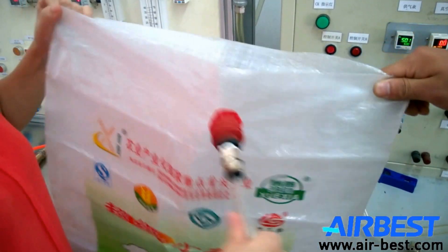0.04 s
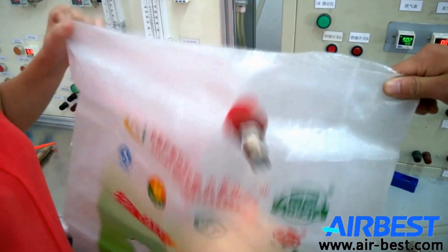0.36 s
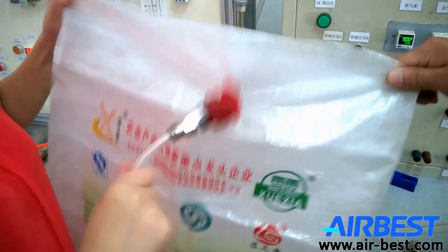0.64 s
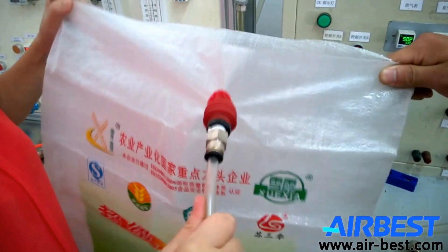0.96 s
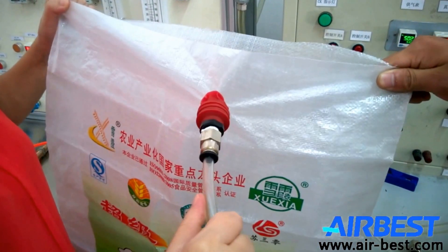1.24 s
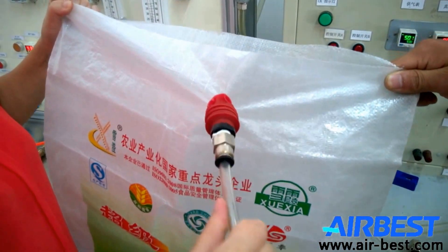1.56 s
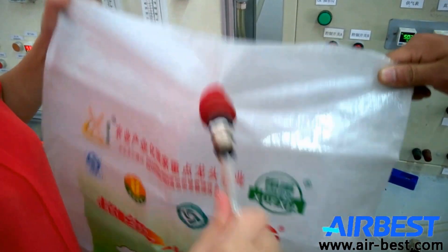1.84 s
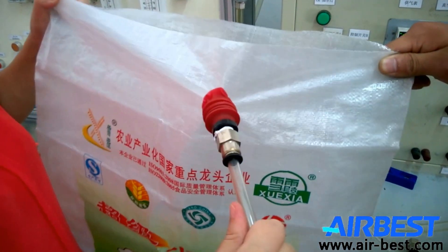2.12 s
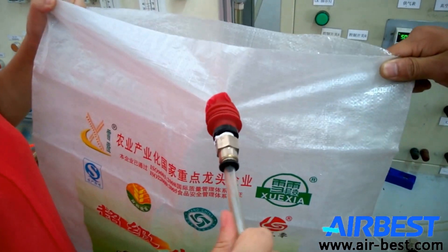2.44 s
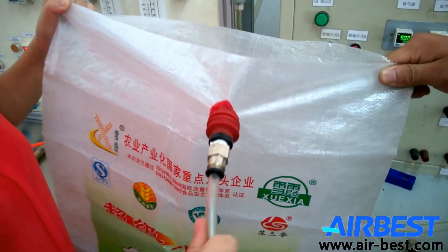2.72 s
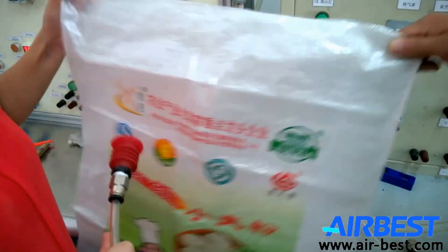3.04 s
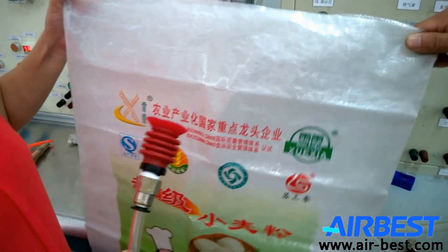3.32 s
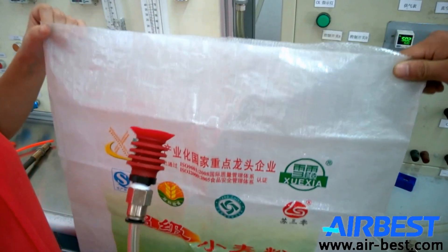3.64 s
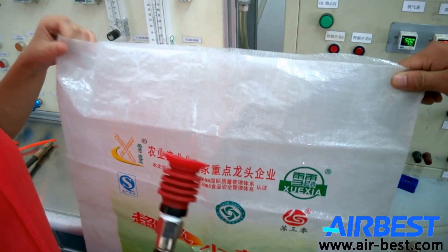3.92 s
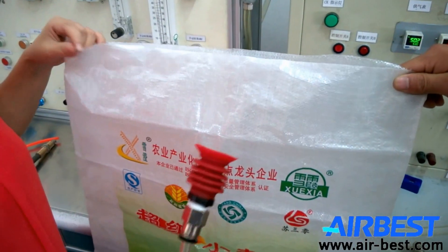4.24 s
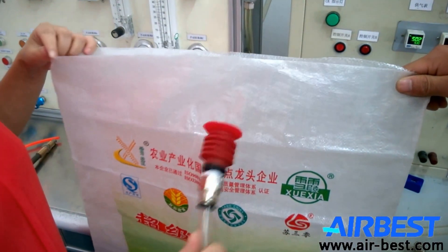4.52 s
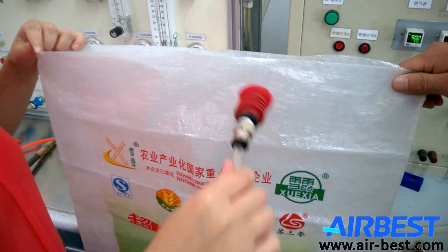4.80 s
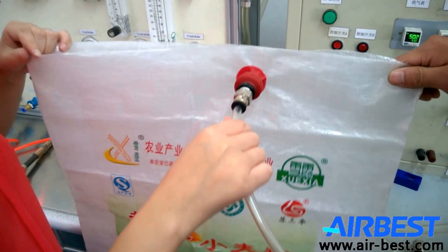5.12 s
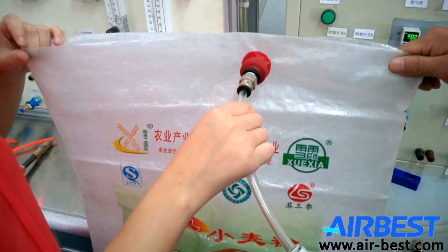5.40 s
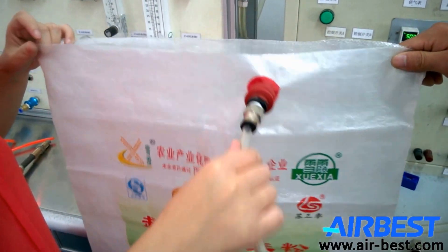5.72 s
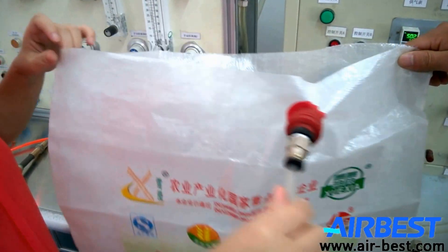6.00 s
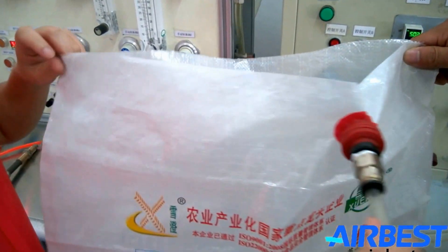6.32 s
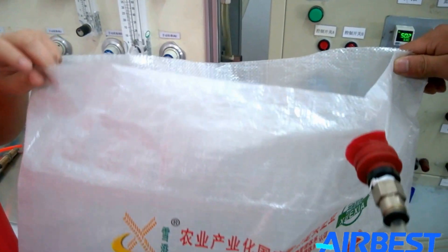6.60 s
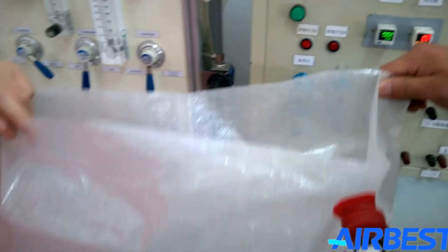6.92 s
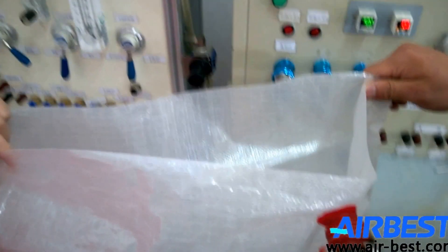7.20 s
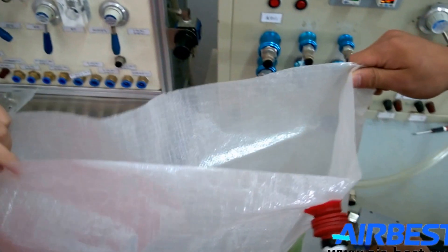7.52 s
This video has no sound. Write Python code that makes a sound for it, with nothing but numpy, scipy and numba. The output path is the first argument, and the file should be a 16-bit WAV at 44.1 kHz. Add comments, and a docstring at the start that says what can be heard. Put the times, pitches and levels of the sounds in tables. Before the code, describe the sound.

A hollow rush of air runs while a woven plastic bag drums and snaps against a suction cup, then comes off with a puff.

```python
"""A hollow, hissing roar: the exhaust of a compressed-air ejector whose bellows suction cup holds a
woven plastic bag. The bag is tugged seven times, pulled off with a puff and a buzz, and gripped again.
The jet's resonance falls and its hiss dulls as the cup seals; both rise when it draws free air.
The bag is a damped membrane that drums and snaps when taut and flaps when slack. A machine hums
alongside; a control panel and the bag reflect the hiss, and the hall reverberates with the rest."""
import sys
import numpy as np
from scipy import signal
from scipy.fft import rfft, irfft
from scipy.io import wavfile
from scipy.ndimage import uniform_filter1d
from numba import njit

SR = 44100
rng = np.random.default_rng(int(sys.argv[2]) if len(sys.argv) > 2 else 0)


def to_wav(s):
    """Save 16-bit WAV."""
    ch = np.atleast_2d(s).T  # columns
    pcm = np.round(np.clip(ch, -1, 1) * 32767)  # PCM
    wavfile.write(sys.argv[1], SR, pcm.astype(np.int16))


N = 341775
T = np.arange(N) / SR
FREQS = np.maximum(np.arange(N // 2 + 1) * SR / N, 1)

# shifts of the cup's grip: t/s, settling time/s, air flow (0 sealed, 1 open),
# relative jet level/dB, relative rim sizzle level/dB
GRIPS = [(0, .01, .07, -27, -33), (.53, 0.094, 0.35, -30, -31), (.75, .07, 0.43, -34.5, -29.5),
         (1.35, .07, .29, -27, -33.5), (1.7, 0.19, 0.24, -30.5, -34.5), (2.15, .25, 0.34, -28, -34.5),
         (2.58, 0.39, 0.31, -35, -30), (3.01, 0.05, 0.96, -28.5, -27), (3.7, 0.74, 0.96, -30, -28),
         (5.0, 0.12, .01, -29, -35.8), (5.82, 0.21, 0.73, -34.5, -29.5), (6.55, .6, 0.66, -26.5, -29.5),
         (7.28, 0.25, 0.66, -28, -29.5)]
# spectra of the turbulent air: f/Hz, relative spectral level/dB
ROAR_SPECTRUM = [(25, -52), (60, -40), (120, -29), (250, -14), (420, -4), (550, -6), (680, 3.5), (800, -1),
                 (950, -2), (1150, 0.5), (1560, 2), (1730, -3), (2200, 0), (2750, 1), (3300, -10.5),
                 (6000, -22)]
HISS_SPECTRUM = [(1500, -31), (2900, 1), (3700, 4), (4400, -1), (5000, 0), (5700, -3.5), (6600, -2.5),
                 (7500, -3.5), (10000, -6), (16000, -38)]
SIZZLE_SPECTRUM = [(100, -49), (5000, -14), (7500, -4), (9300, -0.5), (10100, 2.5), (11000, 0.5),
                   (12000, 2.5), (13200, 2), (14500, -2.5), (16000, -4)]
INTAKE_SPECTRUM = [(30, -46), (60, -24), (130, -10), (200, -4.5), (300, -1), (420, 3), (560, 0), (750, 3.5),
                   (950, -1), (1150, -10), (1500, -32), (4000, -21)]
# resonances of the exhaust housing and the bench: f/Hz, bandwidth/Hz, gain at full drive/dB
HOUSING_MODES = [(661, 37, 3.5), (712, 11, 2.5), (742, 10.5, 0.5), (740.7, 6.9, 6), (878, 16, 2),
                 (1076, 13.4, 7), (1126, 15.6, 10.5), (1172, 24, 7.5), (1235, 18, 5), (1365, 24, 6),
                 (1480, 28, 2), (1508, 17, 6), (1585, 24.5, 9.5), (1793, 9.8, 4), (1880, 21, 4.5),
                 (2000, 13.6, 10.5), (2154, 24, 10), (2282, 10, 11), (2490, 11, 7)]
# breathy tones at the rim: start t/s, end t/s, f/Hz, level/dB
EDGE_TONES = [(0, 0.548, 4830, -46), (.75, 1.4, 10200, -42), (1.4, 2.95, 10200, -46),
              (3.1, 5.0, 10500, -57), (3.35, 4.002, 4950, -43), (3.55, 3.95, 7050, -46),
              (4.15, 4.85, 8650, -45), (3.2, 5.0, 3650, -55), (6.0, 6.8, 13700, -43)]
# tugs that stretch the bag: t/s, drumming level/dB, rustle level/dB, relative snap level/dB
TUGS = [(.712, -25, -24.5, -22), (.981, -26, -27, -18.5), (1.247, -25, -25, -17), (1.51, -25, -27.5, -23),
        (1.772, -25, -24.5, -20), (2.038, -26, -25.5, -18), (2.310, -26, -25.5, -20)]
# the snap and two rebounds within each tug: delay/s, relative level/dB, f/Hz, T60/s
REBOUNDS = [(0, 3.5, 200, .03), (.024, 0, 248, .035), (.097, -2.5, 225, .028)]
# looser shakes as the cup takes hold, eases off and pulls free: t/s, drumming level/dB, rustle level/dB
SHAKES = [(.39, -35.5, -39), (.49, -36, -30.5), (2.57, -35.5, -52), (2.91, -39, -48), (3.08, -28.5, -25),
          (3.22, -40, -31)]
# spectra of the vibrating sheet: f/Hz, relative spectral level/dB
DRUM_SPECTRUM = [(25, -33), (50, -11), (75, -18), (105, 3.5), (155, 1), (215, 5), (265, -3), (300, 2.5),
                 (360, -1.5), (450, -8), (700, -22), (2000, -46), (6000, -90)]
RUSTLE_SPECTRUM = [(100, -40), (300, -24), (520, -20), (630, -6), (880, -5), (1050, -8), (1400, -12.5),
                   (2500, -35), (8000, -34)]
# single flaps of the slack bag: t/s, peak level/dB, f/Hz, T60/s
SLACK_FLAPS = [(.294, -21, 200, 0.038), (.526, -13.5, 202, 0.051), (.618, -28, 70, 0.076),
               (3.044, -25, 130, 0.026), (3.083, -25, 95, .07), (3.178, -27, 96, 0.085),
               (4.974, -27, 172, .025), (4.992, -33, 148.7, 0.027)]
# air bursting past the cup's lip: t/s, relative level/dB, T60/s, f/Hz, bandwidth/Hz
LIP_PUFFS = [(.524, -16.5, 0.1, 1700, 2200), (3.040, -4, 0.063, 3170, 300), (3.044, -21, 0.068, 2315, 5000)]
# the sheet buzzing against the lip as it slides off: t/s, f/Hz, level/dB
LIP_BUZZ = [(3.08, 253, -34), (3.105, 277, -29), (3.14, 288, -25.5), (3.19, 307, -36), (3.21, 310, -44),
            (3.27, 295, -31), (3.33, 300, -43)]
# mains and motor lines of the machine: f/Hz, level/dB
HUM_LINES = [(100, -61), (297, -64), (348, -59)]
# low rumble, swelling near 7 s: t/s, level/dB
RUMBLE_LEVELS = [(0, -55), (.7, -48), (2.6, -53), (3.6, -62), (4.3, -61), (4.9, -53), (5.8, -61),
                 (6.7, -56), (7.0, -56), (7.55, -63)]
# stereo width: f/Hz, side level relative to mid/dB
SIDE_LEVELS = [(30, -37), (80, -29), (480, -25), (900, -30), (1130, -41), (2200, -40), (3000, -26),
               (4000, -21), (5500, -17.5), (8000, -16.5), (16000, -18)]

# set by the air flow: (cup sealed, cup open); the levels are relative
JET_HZ, JET_WIDTH_HZ = (1768, 2530), (200, 580)
ROAR_DB, HISS_DB, INTAKE_DB = (-28.4, -26), (-37, -30.5), (-48.5, -34)


def exhaust(flow, jet_db, trim_db=-2.0, waver_db=.5, flutter_db=.5):
    """Jet turbulence roars broadly and excites a resonance that rises and widens with the flow."""
    hz, width = opened(JET_HZ, flow), opened(JET_WIDTH_HZ, flow, power=2.3)
    roar = colour(noise(), ROAR_SPECTRUM) * undb(opened(ROAR_DB, flow, power=1.15))
    jet = resonate(noise(), hz, width)
    jet = unit(resonate(jet, hz, 4 * width) / np.sqrt(width))  # a wider pass steepens the flanks
    jet = housing(jet, depth=0.71) * undb(jet_db + trim_db + flutter_db * walk(6))
    return (housing(roar) + jet) * undb(waver_db * walk(2.7))


def grip():
    """The seal throttles the air: flow, jet level and sizzle level ease to each new grip's values."""
    state = np.outer(GRIPS[0][2:], np.ones(N))
    for before, (start, settle_s, *after) in zip(GRIPS, GRIPS[1:]):
        ease = np.sin(np.pi / 2 * np.clip((T - start) / settle_s, 0, 1)) ** 2
        state = state + np.outer(np.subtract(after, before[2:]), ease)
    flow, jet_db, rim_db = state
    return np.maximum(flow, 0), jet_db, rim_db


def housing(x, depth=1):
    """Narrow fixed resonances make the rush hollow; depth is how strongly the air drives them."""
    lift_db = sum(db / (1 + (2 * (FREQS - hz) / width) ** 2) for hz, width, db in HOUSING_MODES)
    return irfft(rfft(x) * undb(depth * lift_db), N)


def intake(flow):
    """Turbulent inflow at the open cup adds a throaty rush."""
    return housing(colour(noise(), INTAKE_SPECTRUM)) * undb(opened(INTAKE_DB, flow, power=1.8))


def hiss(flow, rim_db, trim_db=0.37, flicker_db=0.39):
    """Fine-scale turbulence radiates treble: a rush at the nozzle and a sizzle at the cup's rim."""
    rush = colour(reflections(noise()), HISS_SPECTRUM) * undb(opened(HISS_DB, flow, power=5.0))
    sizzle = colour(reflections(noise()), SIZZLE_SPECTRUM) * undb(rim_db + trim_db)
    return (rush + sizzle) * undb(flicker_db * walk(23))


def edge_tones(width_hz=300, drift=0.0034, waver_db=2.2):
    """Edge tones: air shearing over the rim half whistles, never at a steady pitch."""
    out = 0
    for start, end, hz, db in EDGE_TONES:
        centre = hz * (1 + drift * walk(1.5))
        tone = resonate(noise(), centre, steady(width_hz))
        tone = unit(resonate(tone, centre, steady(3 * width_hz)))
        out = out + tone * undb(db + waver_db * walk(5.1)) * gate(start, end)
    return out


def shudder(slips_per_s=500, scatter_db=3):
    """Impulsive excitation: dense slips of the weave drum on the sheet, which rustles when pulled."""
    starts, drum_db, rustle_db = np.transpose([row[:3] for row in TUGS + SHAKES])
    slips = (rng.random(N) < slips_per_s / SR) * np.sign(noise()) * undb(scatter_db * noise())
    drum = strain(starts, drum_db, attack_s=.016, hold_s=.205, sag_db_per_s=36, release_db_per_s=135)
    rustle = strain(starts, rustle_db, attack_s=.018, hold_s=.115, sag_db_per_s=28, release_db_per_s=160)
    return drum * colour(slips, DRUM_SPECTRUM) + rustle * colour(noise(), RUSTLE_SPECTRUM)


def strain(starts, levels_db, attack_s, hold_s, sag_db_per_s, release_db_per_s):
    """Envelope of pulls that rise, sag and die away; being incoherent, they add in power."""
    power = 0
    for start, db in zip(starts, levels_db):
        age = np.clip(T - start, 0, 2)
        fall_db = sag_db_per_s * np.minimum(age, hold_s) + release_db_per_s * np.maximum(age - hold_s, 0)
        power = power + (np.minimum(age / attack_s, 1) * undb(db - fall_db)) ** 2
    return np.sqrt(power)


def flaps(taut_cutoff_hz=95):
    """Tension raises a membrane's pitch: each tug snaps it three times; slack, it flaps once, deeper."""
    taut = [(start + delay, snap_db + db, hz, t60)
            for start, _, _, snap_db in TUGS for delay, db, hz, t60 in REBOUNDS]
    bass_cut = signal.butter(2, taut_cutoff_hz, "high", fs=SR, output="sos")
    return signal.sosfilt(bass_cut, place(taut, snap)) + place(SLACK_FLAPS, snap)


def snap(age, hz, t60, rise_s=0.00073):
    """A heavily damped free oscillation of the sheet, with peak 1."""
    onset = 1 - np.exp(-(age / rise_s) ** 2)
    swing = -np.sin(2 * np.pi * hz * age) * onset * undb(-60 * age / t60)
    return swing / np.abs(swing).max()


def lip_buzz(waver=0.0236, octave_db=-12):
    """Self-sustained oscillation: the loose sheet beats against the cup's lip like a reed."""
    hz, db = curves(LIP_BUZZ)
    phase = 2 * np.pi * np.cumsum(hz * (1 + waver * walk(43))) / SR
    buzz = np.sqrt(2) * (np.sin(phase) + undb(octave_db) * np.sin(2 * phase))
    return buzz * undb(db) * gate(LIP_BUZZ[0][0], LIP_BUZZ[-1][0])


def puff(age, t60, hz, width, rise_s=0.0026):
    """As the seal breaks, a turbulent burst excites one resonance; the soft lip opens gradually."""
    swell = (1 - np.exp(-age / rise_s)) * undb(-60 * age / t60)
    return 2 * resonate(rng.standard_normal(len(age)) * swell, steady(hz), steady(width))


def machine(waver_db=5.0):
    """Forced vibration: mains and motor radiate wavering spectral lines; a faint low rumble lies beneath."""
    hum = 0
    for hz, db in HUM_LINES:
        phase = 2 * np.pi * hz * T + 0.6 * walk(4.1)
        hum = hum + np.sqrt(2) * np.sin(phase) * undb(db + waver_db * walk(3))
    rumble = colour(noise(), [(15, -11), (45, -9), (110, -8), (400, -14), (2000, -60)])
    return hum + rumble * undb(curves(RUMBLE_LEVELS)[0])


def reflections(x, gain=0.43, longest_s=.012, sway_s=.00004, count=8):
    """Comb filtering: echoes off the panel and bag make spectral ripples that shift as hands move."""
    lags = rng.uniform(0.001012, longest_s, count)
    echoes = sum(np.interp(T - lag - sway_s * walk(0.65), T, x, left=0) for lag in lags)
    return unit(x + gain * echoes)


def hall(x, t60=0.26, wet_db=-12):
    """Reverberation: a diffuse, exponentially decaying tail follows the direct sound."""
    tail = unit(noise() * undb(-60 * T / t60)) / np.sqrt(N)
    return x + undb(wet_db) * signal.fftconvolve(x, tail[:SR])[:N]


def widen(x, scatter_s=0.017):
    """Decorrelation: scattered sound arrives left and right in unrelated phase, mostly in the treble."""
    phase = np.angle(rfft(noise() * np.exp(-T / scatter_s)))
    side = irfft(rfft(x) * np.exp(1j * phase) * response(SIDE_LEVELS), N)
    return x + side * np.array([[1], [-1]])


@njit
def resonate(x, hz, width):
    """A second-order resonator (state-variable band-pass) whose centre and bandwidth can move."""
    out, band_state, low_state = np.empty(len(x)), 0., 0.
    for i in range(len(x)):
        step, damping = np.tan(np.pi * hz[i] / SR), width[i] / hz[i]
        band = (band_state + step * (x[i] - low_state)) / (1 + step * (step + damping))
        band_state = 2 * band - band_state
        low_state += 2 * step * band
        out[i] = damping * band
    return out


def opened(ends, flow, power=1):
    """A power law of the air flow leads from the sealed value to the open one."""
    return ends[0] + (ends[1] - ends[0]) * flow ** power


def place(rows, shape):
    """Superposition of one short sound per row of t/s, level/dB and shape arguments."""
    out, age = np.zeros(N + SR), np.arange(SR // 4) / SR
    for start_s, db, *settings in rows:
        start = int(start_s * SR)
        out[start:start + len(age)] += undb(db) * shape(age, *settings)
    return out[:N]


def response(points):
    """Gain at each frequency from points of f/Hz, level/dB, joined on a logarithmic axis."""
    hz, db = np.transpose(points)
    return undb(np.interp(np.log(FREQS), np.log(hz), db))


def colour(x, points):
    """Spectral shaping of x, at rms 1."""
    return unit(irfft(rfft(x) * response(points), N))


def curves(table):
    """Linear interpolation of each column of a timed table."""
    times, *columns = np.transpose(table)
    return [np.interp(T, times, column) for column in columns]


def gate(start, end):
    """A time window with soft edges."""
    return uniform_filter1d(1. * ((T > start) & (T < end)), size=1500)


def walk(rate_hz):
    """Slow random fluctuation: low-passed noise at rms 1."""
    return unit(irfft(rfft(noise()) / (1 + (FREQS / rate_hz) ** 4), N))


def noise():
    """White Gaussian noise."""
    return rng.standard_normal(N)


def steady(value):
    """A constant control signal."""
    return np.full(N, float(value))


def undb(db):
    """Decibels to amplitude ratio."""
    return 10 ** (np.asarray(db) / 20)


def unit(x):
    """Normalisation to rms 1."""
    return x / np.sqrt(np.mean(x ** 2))


def scene():
    """Superposition: air, bag and machine sound in the hall; hiss and edge tones skip its tail."""
    flow, jet_db, rim_db = grip()
    air = exhaust(flow, jet_db) + intake(flow)
    bag = shudder() + flaps() + lip_buzz() + place(LIP_PUFFS, puff)
    return widen(hall(air + bag + machine()) + hiss(flow, rim_db) + edge_tones())


def record(dry, cutoff_hz=15850):
    """Band limiting: a steep elliptic low-pass removes the highest treble."""
    return signal.sosfilt(signal.ellip(12, .2, 80, cutoff_hz, fs=SR, output="sos"), dry)


dry = scene()
out = record(dry)
to_wav(out)
```